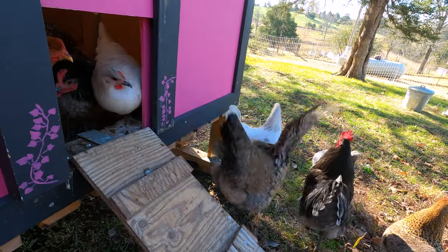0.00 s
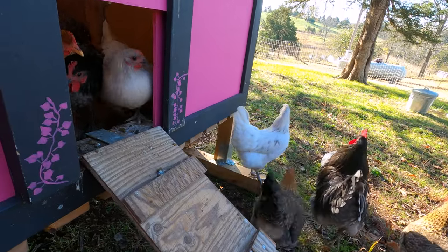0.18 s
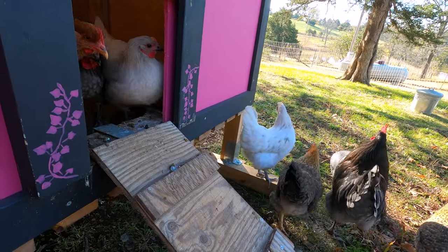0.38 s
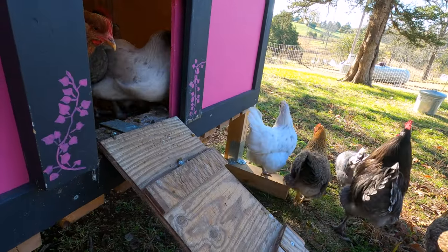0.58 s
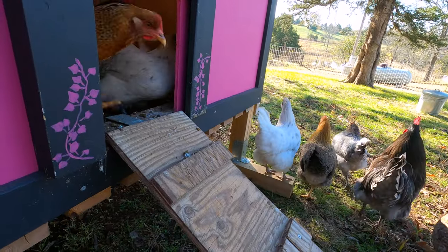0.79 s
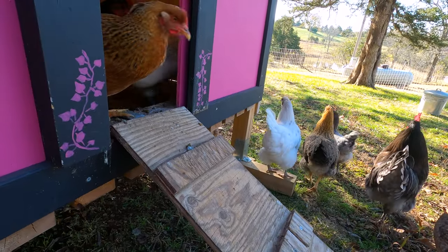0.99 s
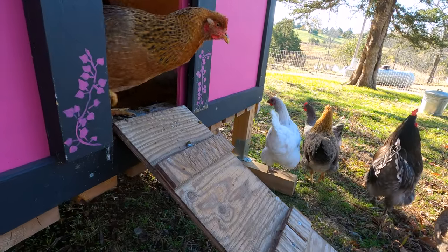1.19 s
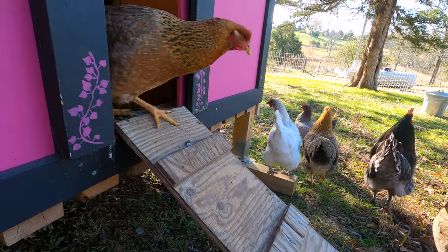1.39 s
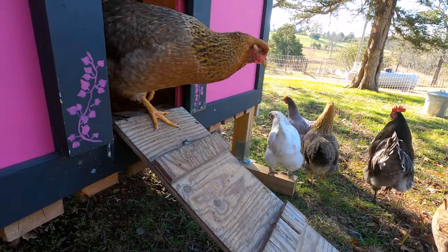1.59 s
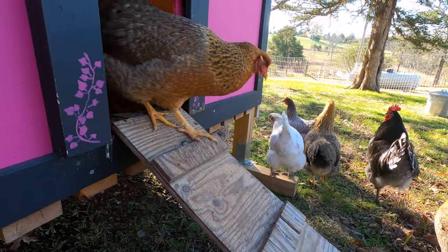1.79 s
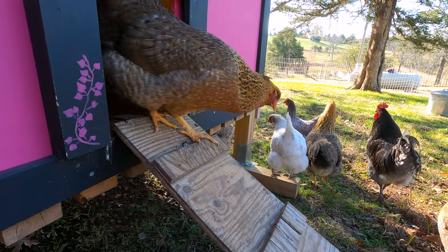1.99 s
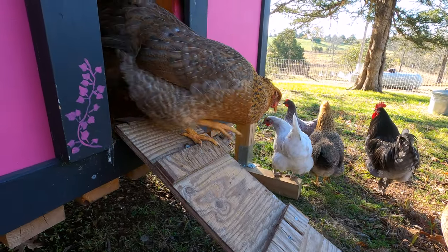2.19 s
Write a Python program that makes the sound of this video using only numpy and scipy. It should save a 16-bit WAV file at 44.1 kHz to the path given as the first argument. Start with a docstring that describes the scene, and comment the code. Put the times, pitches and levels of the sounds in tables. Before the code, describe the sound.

A hen's feet thump and scuff across a hollow wooden coop floor, with soft clucks

```python
"""Hens at a wooden coop in a backyard, over quiet air and the rustle of dry leaves under the flock.
First come two of four short, soft clucks, pulse trains shaped by throat resonances, amid claw taps.
From about 0.6 s a hen scuffs and treads across the hollow floor: stick-slip grains ring the boards,
a slipping claw squeaks, and decaying thumps and filtered noise make the rumble, strongest near 0.9 s.
Noise-burst claw ticks on the ramp and the rustle of leaves run on; two more clucks come after 1.3 s."""
import sys
import numpy as np
from scipy import signal
from scipy.fft import rfft, irfft
from scipy.io import wavfile
from scipy.ndimage import uniform_filter1d

SR = 44100
rng = np.random.default_rng(int(sys.argv[2]) if len(sys.argv) > 2 else 0)


def transcribe(signal):
    """Save signal, clipped to [-1, 1], as a 16-bit WAV file at the path in sys.argv[1]."""
    frames = np.atleast_2d(signal).T
    limited = np.clip(frames, -1, 1)
    pcm = np.round(limited * 32767).astype(np.int16)
    wavfile.write(sys.argv[1], SR, pcm)


N = 97020
T = np.arange(N) / SR  # t/s


# Clucks, some in two parts: t/s, length/s, starting pitch f/Hz, pitch fall/octaves over the length,
# level/dB, sharpness of the throat resonance (a factor on the throat's dB)
CLUCKS = [(0.204, 0.05, 254, 0.06, -40, 1.5), (0.386, 0.019, 275, -0.065, -37, 2),
          (0.405, 0.019, 249, -0.037, -45.5, 3.8), (1.331, 0.0077, 236, 0.15, -36, 2.5),
          (1.345, 0.017, 244, 0.08, -36, 2.9), (1.575, 0.021, 239, -0.43, -51, 8.1),
          (1.593, 0.0094, 250, -0.041, -33.5, 3.9)]
# Throat and beak resonance: f/Hz, level/dB before the sharpness factor
THROAT = [(380, -12), (520, -5), (780, -3.5), (1020, -7), (1270, -10.5), (1550, -13), (3500, -56)]
CLUCK_ATTACK_S, CLUCK_RELEASE_S = 0.0081, 0.016
CLUCK_ARCH, CLUCK_JITTER = 0.029, 0.02  # octaves: rise in mid-call, random spread
CLUCK_SHIMMER = 0.24  # random spread of amplitude, as a fraction
CLUCK_ECHO_DB = -14.5


def clucks():
    """Source-filter principle: harmonics of a gliding, arched pitch are weighted by the throat."""
    out = np.zeros(N)
    for start, length, hz, fall, db, sharpness in CLUCKS:
        t = T - start
        progress = np.clip(t / length, 0, 1.3)
        jitter, shimmer = waver(), waver()
        arch = CLUCK_ARCH * np.sin(np.pi * progress)
        pitch = hz * 2 ** (-fall * progress + arch + CLUCK_JITTER * jitter)
        attack = np.clip(t / CLUCK_ATTACK_S, 0, 1)
        release = np.clip((length - t) / CLUCK_RELEASE_S + .5, 0, 1)
        envelope = attack * release
        on = envelope > 0
        harmonic = np.arange(1, 13)[:, None]
        throat_db = np.interp(harmonic * pitch[on], *np.transpose(THROAT))
        cycles = harmonic * np.cumsum(pitch[on]) / SR + .5 * rng.random(harmonic.shape)
        voice = np.sum(from_db(sharpness * throat_db) * np.sin(2 * np.pi * cycles), axis=0)
        loudness = envelope * (1 + CLUCK_SHIMMER * shimmer)
        out[on] += from_db(db) * rms_one(voice) * loudness[on]
    out = np.array([out, out])
    return out + from_db(CLUCK_ECHO_DB) * yard(out)


# Feet scuffing on the boards: t/s, rise/s, hold/s, fade t60/s, wood level/dB, grit level/dB
SCUFFS = [(0.581, 0.0032, 0.0049, 0.047, -23, -32.5), (0.576, 0.0099, 0.0075, 0.22, -36, -40),
          (0.645, 0.0063, 0.013, 0.088, -38.5, -36.5), (0.66, 0.015, 0.0065, 0.14, -36, -34),
          (0.713, 0.01, 0.17, 0.12, -42.5, -58), (0.85, 0.0025, 0.018, 0.32, -32.5, -42.5),
          (0.898, 0.0044, 0.007, 0.15, -31.5, -40.5), (0.928, .01, 0.14, 0.43, -51, -68),
          (1.092, 0.022, 0.013, 0.6, -43, -70), (1.608, 0.013, 0.006, 0.33, -51.5, -56.5)]
# Ringing modes of the boards: f/Hz, level/dB
BOARDS = [(300, 1), (468, 3.5), (593, 3.5), (730, -1.5), (930, -3), (1085, -2), (1300, -3), (1490, -6),
          (1780, -5.5)]
# Spectrum of claws dragging over grit: f/Hz, level/dB
GRIT = [(700, -6), (1500, 4.5), (3000, 4.5), (4100, 4), (5300, -5), (7000, -1), (8300, -11.5), (12000, -21),
        (15500, -36)]
SCUFF_GRAINS_PER_S, SCUFF_SPREAD_DB = 3500, 1
BOARD_WIDTH_HZ, WOOD_TOP_HZ = 60, 5000
STICK_SLIP_DB, MODE_FLICKER_DB = 3.0, 2.5  # random spread of the grip and of each mode


def scuffs():
    """Stick-slip friction: random slips excite the modes of the boards and hiss over the grit."""
    lowpass = signal.butter(2, WOOD_TOP_HZ, fs=SR, output="sos")
    slips = signal.sosfilt(lowpass, widen(grains(SCUFF_GRAINS_PER_S, SCUFF_SPREAD_DB)))
    grit = widen(colour(grains(SCUFF_GRAINS_PER_S, SCUFF_SPREAD_DB), GRIT))
    push, drag = 0, 0
    for start, rise, hold, t60, wood_db, grit_db in SCUFFS:
        envelope = stroke(start, rise, hold, t60)
        # overlapping strokes add in power
        push = np.hypot(push, envelope * from_db(wood_db))
        drag = np.hypot(drag, envelope * from_db(grit_db))
    grip = rms_one(from_db(STICK_SLIP_DB * waver()))
    wood = 0
    # as the foot moves, it favours one mode and then another
    for k, mode in enumerate(BOARDS):
        flicker = rms_one(from_db(MODE_FLICKER_DB * waver()))
        wood = wood + (-1) ** k * resonate(slips * push * grip * flicker, [mode], BOARD_WIDTH_HZ)
    wood = wood / np.std(resonate(slips, BOARDS, BOARD_WIDTH_HZ))
    return wood + grit * drag * np.sqrt(grip)


# Thin squeaks: t/s, length/s, mean f/Hz, level/dB at the middle
SQUEAKS = [(0.64, 0.058, 1100, -39.5), (0.85, .016, 1161, -36.5), (0.904, 0.024, 1338, -38),
           (1.615, 0.011, 1670, -49.5), (1.952, .014, 1183, -58.5)]
SQUEAK_WAVER = .025  # random spread of frequency, as a fraction


def squeaks():
    """Friction-driven oscillation: a slipping claw sings briefly on one unsteady note."""
    out = 0
    for start, length, hz, db in SQUEAKS:
        swell = np.sin(np.pi * np.clip((T - start) / length, 0, 1))
        cycles = hz * np.cumsum(1 + SQUEAK_WAVER * waver()) / SR
        out = out + from_db(db) * np.sqrt(2) * swell * np.sin(2 * np.pi * cycles)
    return out


# Claw taps on the ramp: t/s, level/dB, centre f/Hz, t60/s
TAPS = [(.192, -41.5, 5830, 0.16), (0.308, -46.5, 8000, 0.018), (0.381, -42.5, 3450, 0.05),
        (0.473, -39.5, 6460, 0.03), (0.531, -44, 2700, 0.032), (0.954, -39.5, 4930, .025),
        (1.036, -46.5, 3460, 0.074), (1.219, -40, 5200, 0.0083), (1.249, -47, 3900, 0.028),
        (1.33, -49, 3850, 0.07), (1.382, -52, 5270, 0.019), (1.401, -51.5, 5400, 0.03),
        (1.445, -43.5, 2400, 0.067), (1.451, -41.5, 4300, 0.049), (1.516, -43, 3100, 0.023),
        (1.546, -47.5, 4300, 0.015), (1.678, -39.5, 2300, 0.0093), (1.7, -49.5, 3700, 0.075),
        (1.719, -48, 1630, 0.0083), (1.761, -48, 2850, 0.012), (1.889, -36, 3240, 0.022),
        (1.9045, -36.5, 4030, 0.015), (2.137, -53.5, 4170, 0.12)]
# Modes of the thin ramp, ringing under a claw: f/Hz, level/dB
RAMP = [(522, 13.5), (1480, 4), (1870, -1.5), (2720, -6.5)]
RAMP_WIDTH_HZ = 106
TAP_ATTACK_S, TAP_OCTAVES = .0006, 1.6  # rise; bandwidth in octaves
TAP_BODY_DB, TAP_ECHO_DB = 6.5, -14.5  # ramp; scatter


def taps():
    """Impact excitation: decaying noise bands ring the ramp, the duller ones most."""
    out = 0
    crack = widen(colour(rng.standard_normal((2, N)), LEAVES))
    for start, db, hz, t60 in TAPS:
        edges = hz * 2 ** (np.array([-.5, .5]) * TAP_OCTAVES)
        band = signal.butter(2, edges, "band", fs=SR, output="sos")
        envelope = stroke(start, TAP_ATTACK_S, 2 * TAP_ATTACK_S, t60)
        out = out + from_db(db) * envelope * rms_one(signal.sosfilt(band, crack))
    out = out + from_db(TAP_BODY_DB) * resonate(out, RAMP, RAMP_WIDTH_HZ)
    return out + from_db(TAP_ECHO_DB) * yard(out)


# Footfalls on the hollow floor: t/s, thump level/dB, thump f/Hz
FOOTFALLS = [(0.399, -34.5, 129), (.583, -24, 245), (0.678, -26, 169), (0.758, -22.5, 67.5),
             (0.855, -22, 271), (0.878, -20, 132), (0.926, -22, 104), (1.346, -27, 240), (1.894, -37, 235)]
# Modes of the floor: f/Hz, level/dB
FLOOR_MODES = [(120, 0), (165, 3), (212, 0), (263, -4), (306, -12.5)]
FLOOR_WIDTH_HZ, FLOOR_DB = 29.7, 6.5  # mode bandwidth; level of the ringing
THUMP_CYCLES = 10.1  # cycles of a thump's t60


def footfalls():
    """Damped oscillation: each step is a decaying sine that sets the floor's modes ringing."""
    out = 0
    for start, db, hz in FOOTFALLS:
        envelope = stroke(start, .5 / hz, 0, THUMP_CYCLES / hz)
        out = out + from_db(db) * envelope * np.sin(2 * np.pi * hz * (T - start))
    return out + from_db(FLOOR_DB) * resonate(out, FLOOR_MODES, FLOOR_WIDTH_HZ)


# Rumble levels of the depths, the boom and the upper part: t/s, level/dB
DEPTHS = [(.42, -61), (.68, -39), (.9, -28), (.98, -33.5), (1.6, -57)]
BOOM = [(0, -41), (.1, -49), (.34, -49.5), (.6, -38.5), (.85, -44), (.94, -24.5), (1.25, -29.5), (1.3, -37),
        (1.471, -31.5), (1.56, -44), (1.7, -38.5), (1.8, -53), (1.9, -43), (2.2, -46.5)]
UPPER = [(0, -43.5), (.13, -63), (.23, -46), (.33, -61.5), (.5, -40), (.82, -39.5), (.94, -29.5),
         (1.06, -40), (1.42, -40.5), (1.8, -57), (2.2, -58)]
# Spectrum of the boom: f/Hz, level/dB
BOOM_SPECTRUM = [(35, -41), (59, 2.5), (74, -3), (99, -3.5), (170, -28.5), (400, -103)]
DEPTHS_HZ = 31.9  # centre of a band one octave wide


def rumble():
    """Forced vibration: low noise and the floor's modes swell as the hen crosses the coop floor."""
    white = rng.standard_normal((3, 2, N))
    edges = [DEPTHS_HZ / np.sqrt(2), DEPTHS_HZ * np.sqrt(2)]
    depths = signal.sosfilt(signal.butter(2, edges, "band", fs=SR, output="sos"), white[0])
    boom = colour(white[1], BOOM_SPECTRUM)
    upper = resonate(white[2], FLOOR_MODES, FLOOR_WIDTH_HZ)
    upper = signal.sosfilt(signal.butter(2, [110, 330], "band", fs=SR, output="sos"), upper)
    out = 0
    for noise, curve in ((depths, DEPTHS), (boom, BOOM), (upper, UPPER)):
        noise = widen(noise)
        # even out the noise's own swells, so that the curve alone sets the level
        power = uniform_filter1d(np.mean(noise ** 2, axis=0), size=1800)
        out = out + level(curve) * noise / np.sqrt(power)
    return out


# Rustle of dry leaves: t/s, level/dB
RUSTLE = [(0, -54), (.17, -50.5), (.28, -55), (.42, -52), (.85, -51), (1.0, -62), (1.2, -56), (1.6, -60),
          (1.84, -67), (2.2, -58.5)]
# Spectrum of the leaves, also of the noise in the claw taps: f/Hz, level/dB
LEAVES = [(400, 2), (1500, 3.5), (4300, 2), (5600, -3), (7000, -3), (8500, -11), (12000, -19), (15500, -34)]
LEAF_GRAINS_PER_S, LEAF_SPREAD_DB = 4000, 2.5


def leaves():
    """Granular noise: many random clicks make dry leaves crackle under the foraging flock."""
    return level(RUSTLE) * widen(colour(grains(LEAF_GRAINS_PER_S, LEAF_SPREAD_DB), LEAVES))


# Spectrum of the quiet yard air: f/Hz, relative level/dB
AIR = [(150, 14.5), (600, -10.5), (1400, -5.5), (12000, -80)]
AIR_DB = -57


def yard_air():
    """Stationary noise: white noise given the spectrum of quiet air."""
    return from_db(AIR_DB) * widen(colour(rng.standard_normal((2, N)), AIR))


YARD_T60_S, YARD_HZ = 0.039, 4760  # decay before the lowpass; its corner


def yard(x):
    """Diffuse reflection: convolution with short, dull scatter from the coop walls and ground."""
    t = T[:SR // 4]
    tail = rng.standard_normal((2, len(t))) * from_db(-60 * t / YARD_T60_S) * (t > .003)
    tail = signal.sosfilt(signal.butter(1, YARD_HZ, fs=SR, output="sos"), tail)
    return signal.fftconvolve(x, tail / np.sqrt(np.sum(tail ** 2) / 2), axes=1)[:, :N]


def resonate(x, modes, width_hz):
    """Modal superposition: parallel resonances of a plank, with alternating signs."""
    out, r = 0, np.exp(-np.pi * width_hz / SR)
    for k, (hz, db) in enumerate(modes):
        poles = [1, -2 * r * np.cos(2 * np.pi * hz / SR), r * r]
        ringing = signal.lfilter([1, 0, -1], poles, x + 1e-18)
        out = out + (-1) ** k * from_db(db) * ringing
    return out * (1 - r * r) / 2


def stroke(start, rise, hold, t60):
    """Exponential decay: a linear rise and a hold, then a fade of 60 dB per t60."""
    t = T - start
    return np.clip(t / rise, 0, 1) * from_db(-60 * np.maximum(t - rise - hold, 0) / t60)


def grains(per_s, spread_db):
    """Poisson-like impulses: two streams of random clicks of uneven size and either sign."""
    size = from_db(spread_db * np.minimum(rng.exponential(1, (2, N)), 4))
    return (rng.random((2, N)) < per_s / SR) * size * rng.choice([-1, 1], (2, N))


def waver():
    """Low-pass randomness: smooth chance that changes every few milliseconds, at unit rms."""
    return rms_one(uniform_filter1d(uniform_filter1d(rng.standard_normal(N), size=130), size=90))


# Stereo width: f/Hz, side minus mid level/dB
WIDTH = [(60, -46), (300, -13), (1300, -6.5), (3000, -4.5), (10000, 0)]


def widen(pair):
    """Interchannel coherence: two noises become left and right, alike in bass, apart in treble."""
    side = colour(pair[1], WIDTH)
    return np.array([pair[0] + side, pair[0] - side]) / np.std(pair[0])


def colour(x, points):
    """Linear filtering: weight the spectrum by points of f/Hz, level/dB."""
    hz, db = np.transpose(points)
    bins = np.maximum(np.arange(N // 2 + 1) * SR / N, 1)
    return irfft(rfft(x) * from_db(np.interp(np.log(bins), np.log(hz), db)), N)


def level(rows):
    """Amplitude modulation: gain in time from points of t/s, level/dB."""
    return from_db(np.interp(T, *np.transpose(rows)))


def from_db(db):
    """Logarithmic level: decibels to amplitude gain."""
    return 10 ** (np.asarray(db) / 20)


def rms_one(x):
    """Effective value: scale to unit rms."""
    return x / np.sqrt(np.mean(x ** 2) + 1e-20)


# Lean towards the coop on the left: f/Hz, left minus right level/dB
LEAN = [(700, 1.35), (1500, 3.5), (2800, 5), (5000, 2), (9000, -1)]


def scene():
    """Superposition: all sources add, then an interchannel level difference leans them left."""
    pair = clucks() + scuffs() + squeaks() + taps() + footfalls() + rumble() + leaves() + yard_air()
    left = colour(pair[0], [(hz, db / 2) for hz, db in LEAN])
    right = colour(pair[1], [(hz, -db / 2) for hz, db in LEAN])
    return np.array([left, right])


CUTOFF_HZ = 15700


def record(dry):
    """Band limiting: a steep elliptic lowpass cuts the top."""
    return signal.sosfilt(signal.ellip(10, .1, 80, CUTOFF_HZ, fs=SR, output="sos"), dry)


dry = scene()
out = record(dry)
transcribe(out)
```